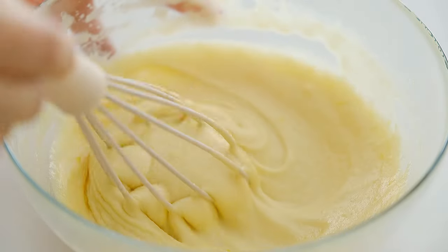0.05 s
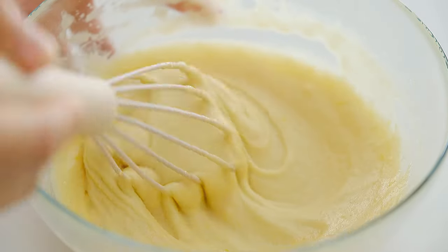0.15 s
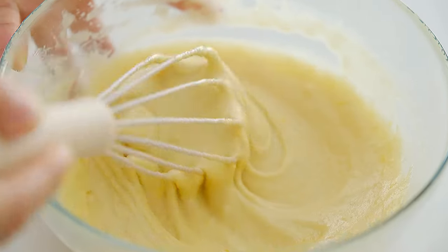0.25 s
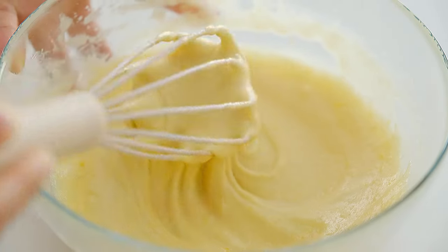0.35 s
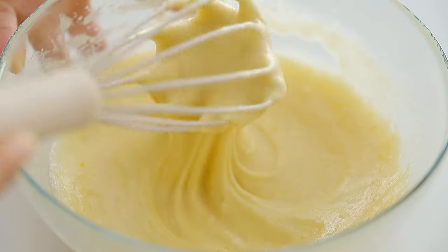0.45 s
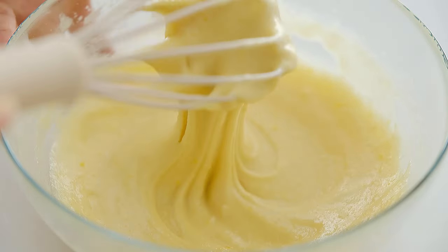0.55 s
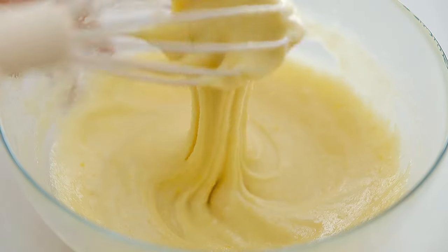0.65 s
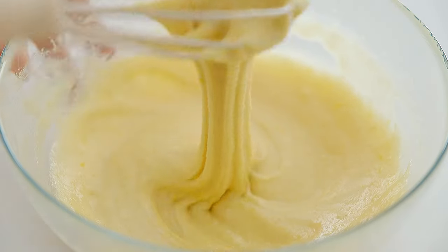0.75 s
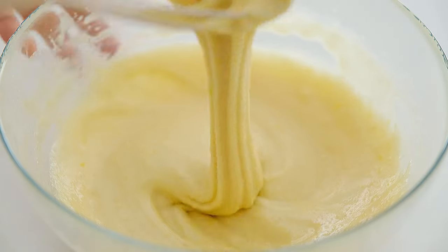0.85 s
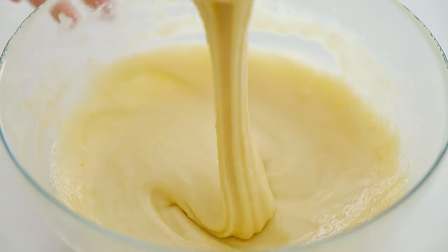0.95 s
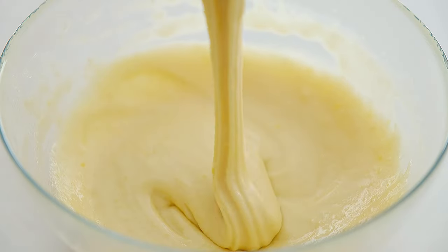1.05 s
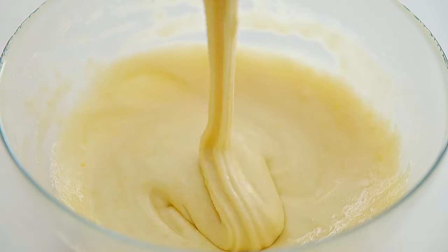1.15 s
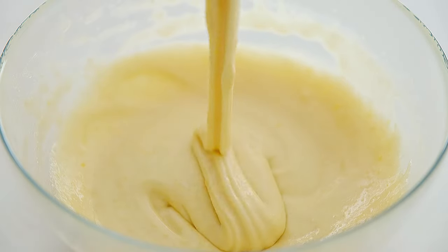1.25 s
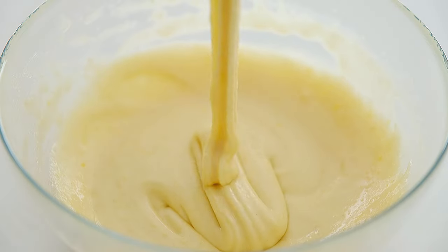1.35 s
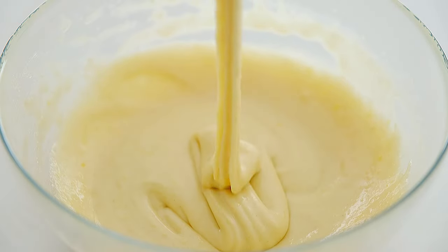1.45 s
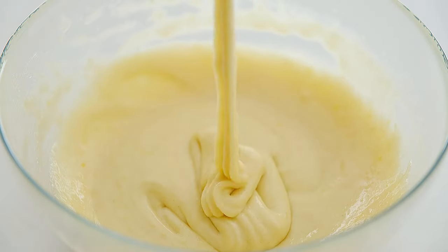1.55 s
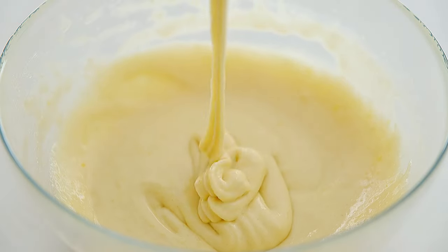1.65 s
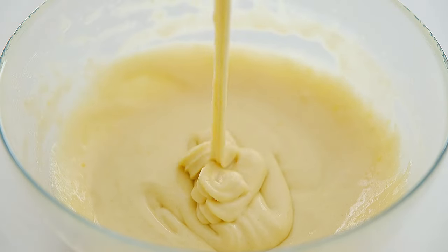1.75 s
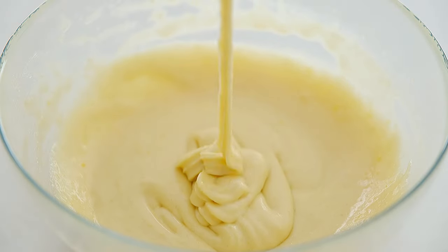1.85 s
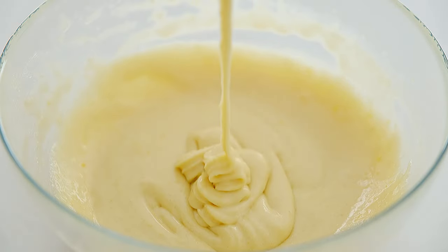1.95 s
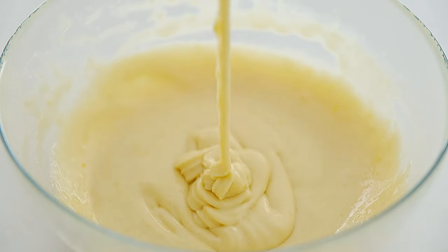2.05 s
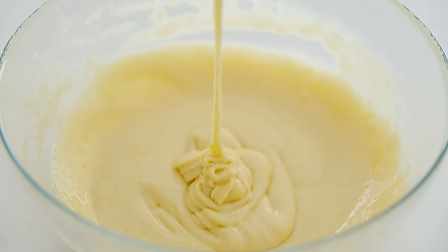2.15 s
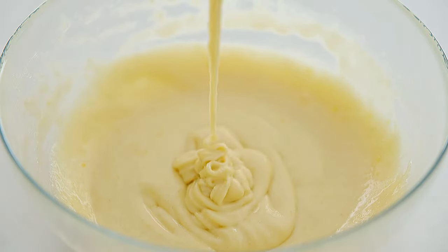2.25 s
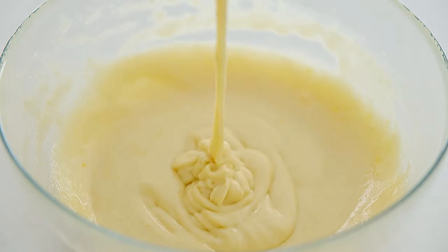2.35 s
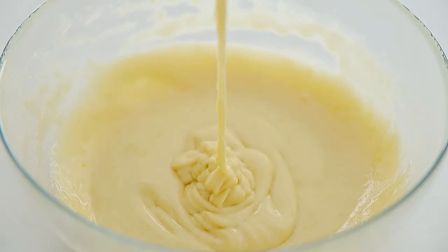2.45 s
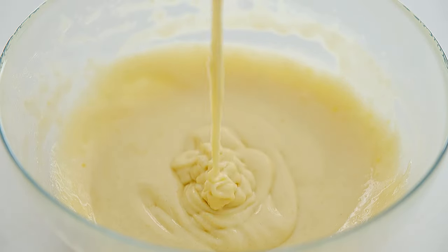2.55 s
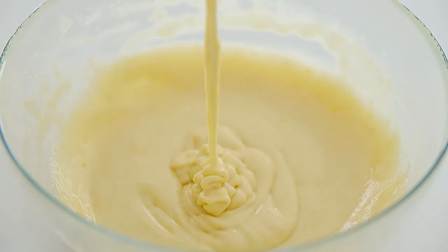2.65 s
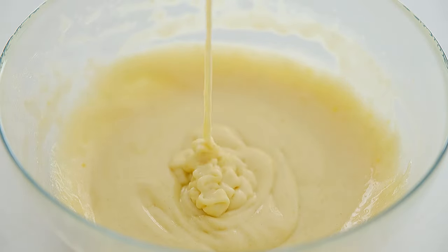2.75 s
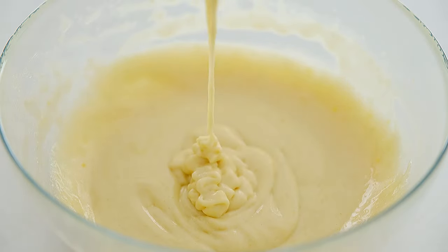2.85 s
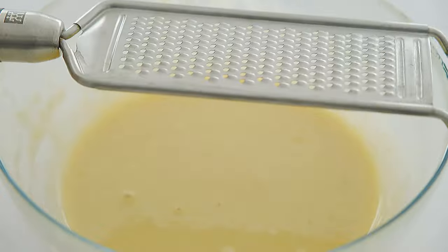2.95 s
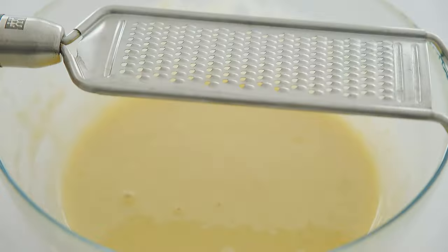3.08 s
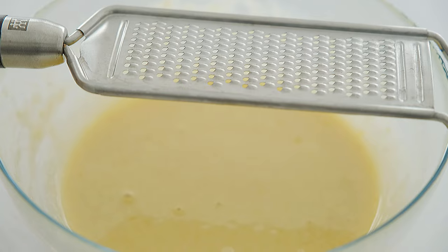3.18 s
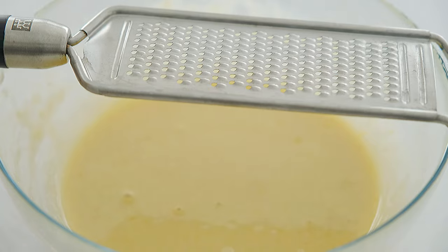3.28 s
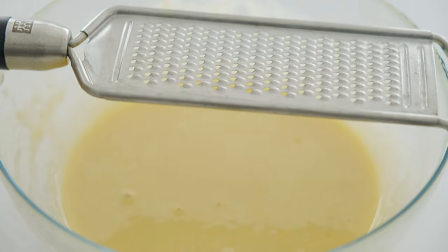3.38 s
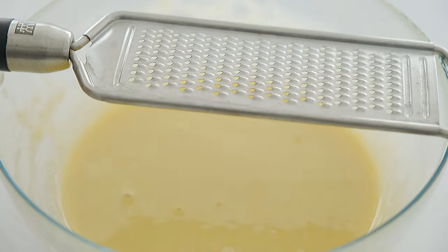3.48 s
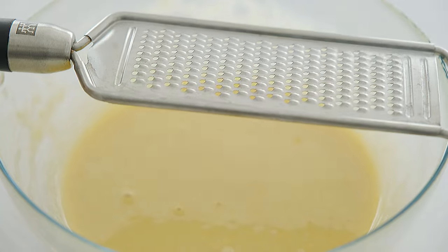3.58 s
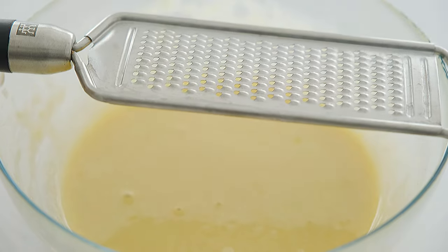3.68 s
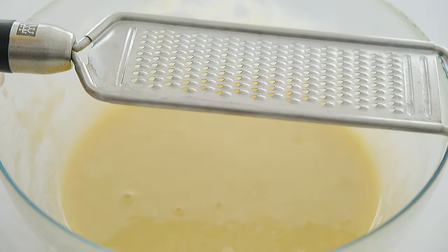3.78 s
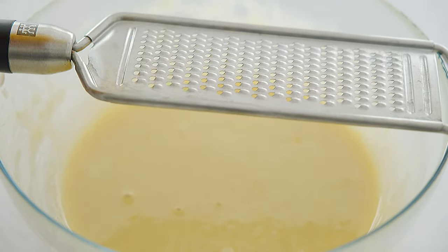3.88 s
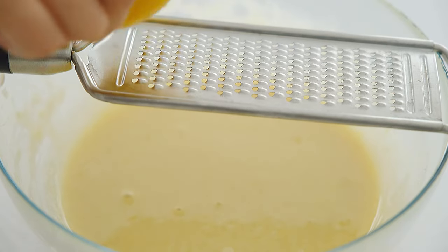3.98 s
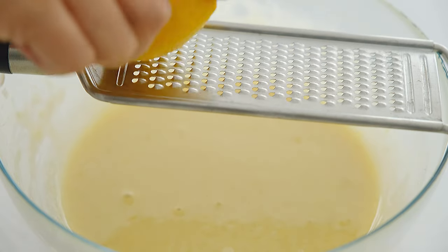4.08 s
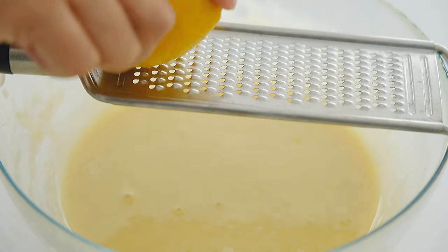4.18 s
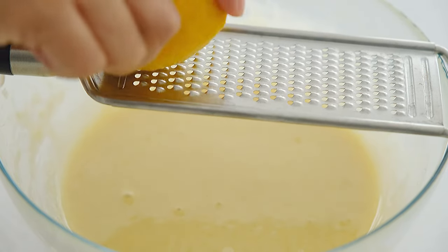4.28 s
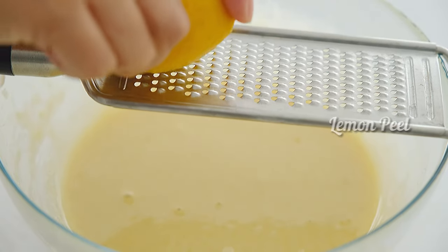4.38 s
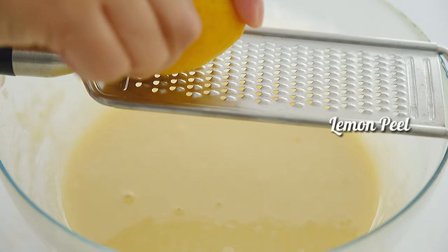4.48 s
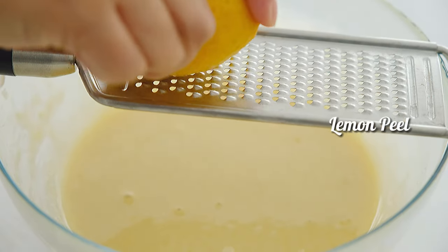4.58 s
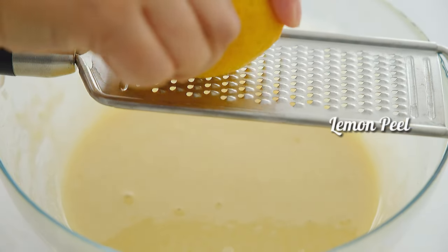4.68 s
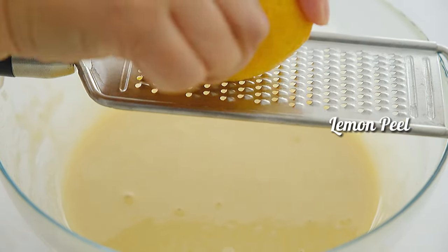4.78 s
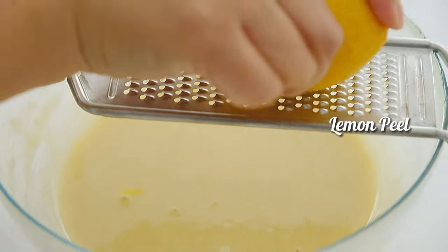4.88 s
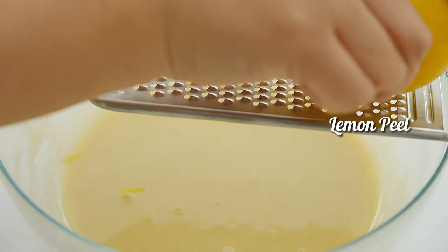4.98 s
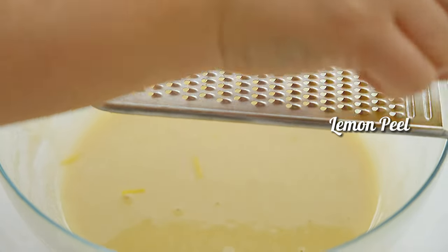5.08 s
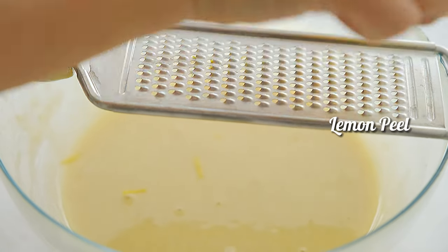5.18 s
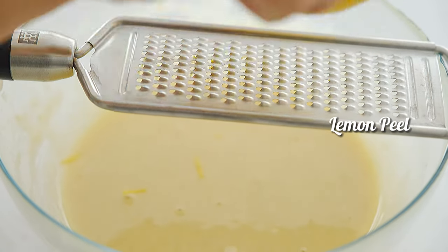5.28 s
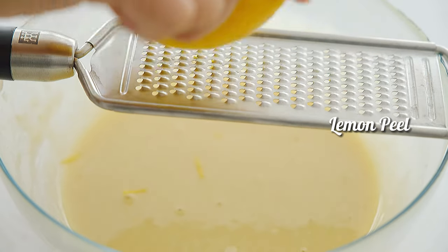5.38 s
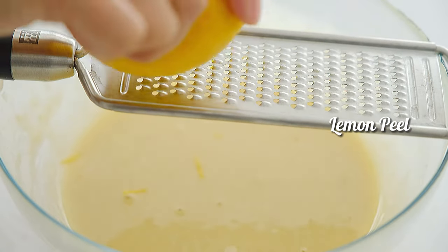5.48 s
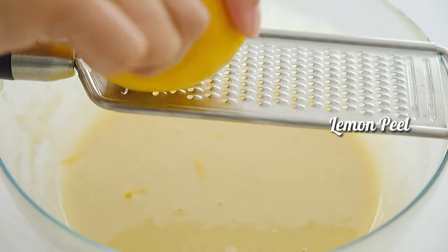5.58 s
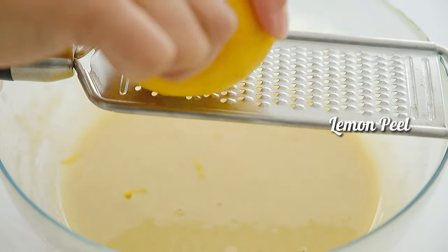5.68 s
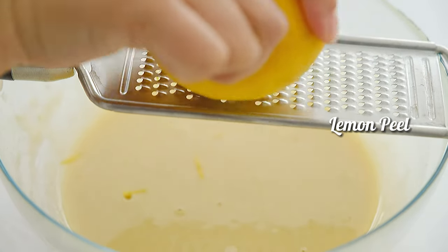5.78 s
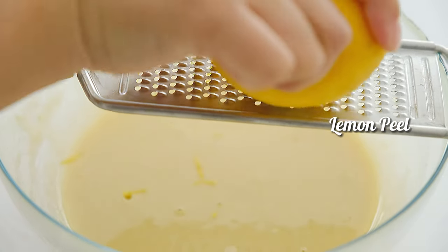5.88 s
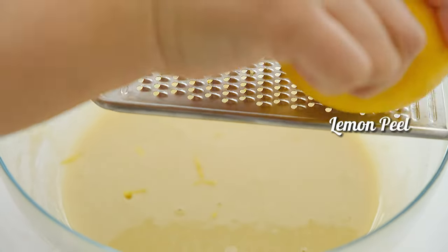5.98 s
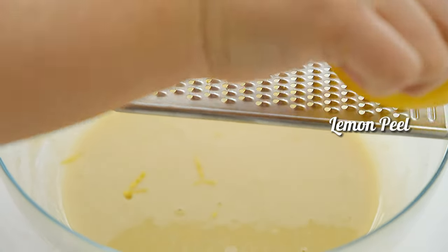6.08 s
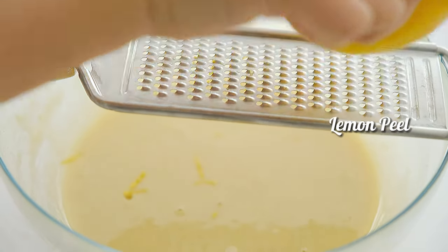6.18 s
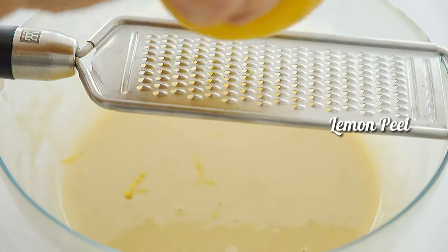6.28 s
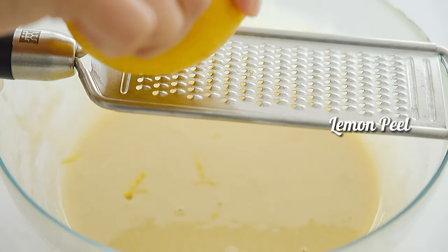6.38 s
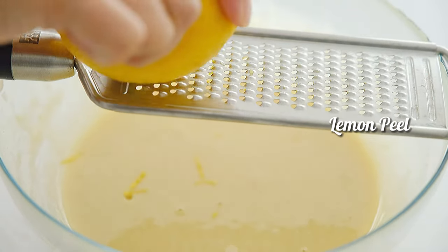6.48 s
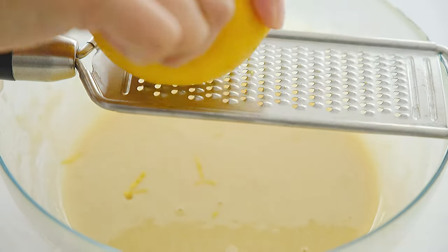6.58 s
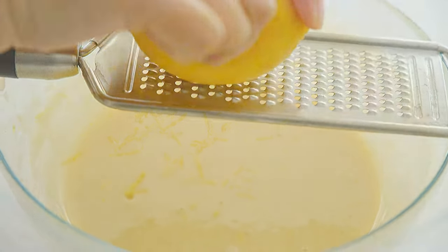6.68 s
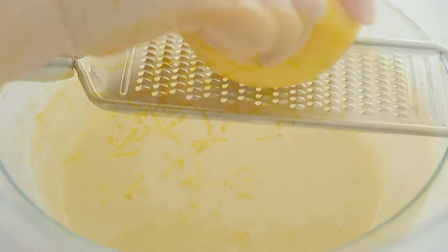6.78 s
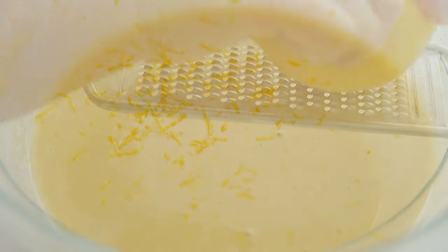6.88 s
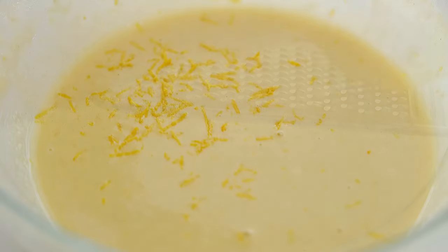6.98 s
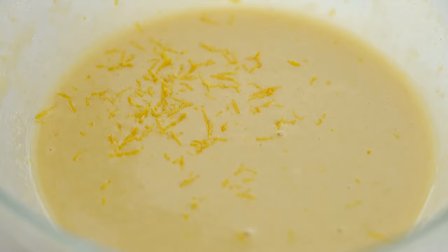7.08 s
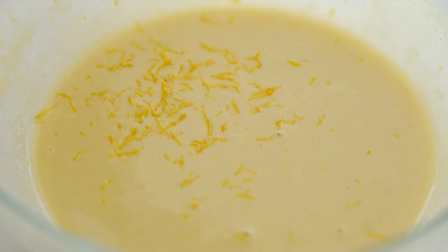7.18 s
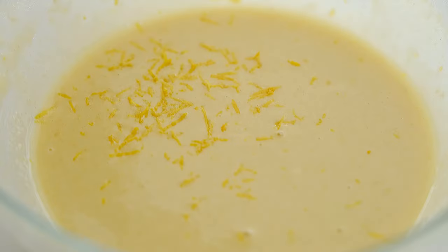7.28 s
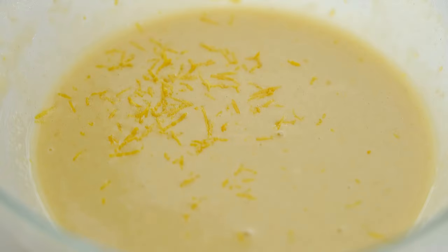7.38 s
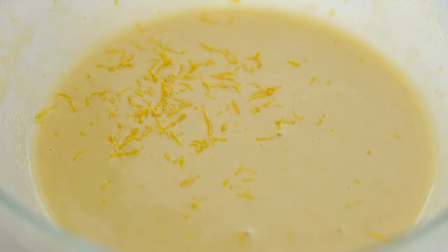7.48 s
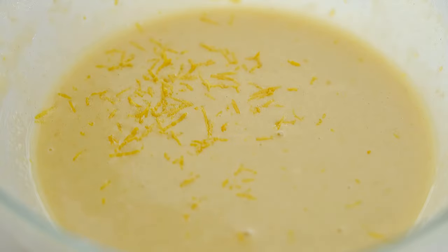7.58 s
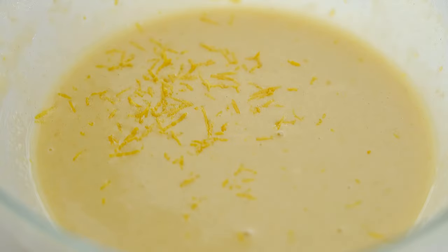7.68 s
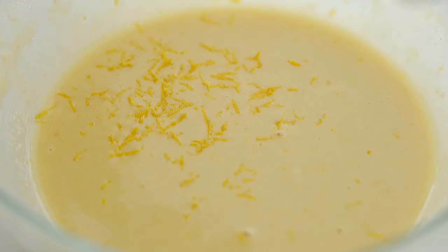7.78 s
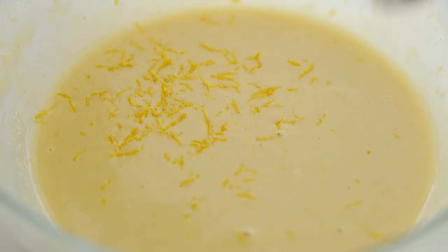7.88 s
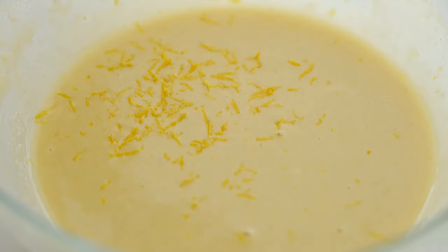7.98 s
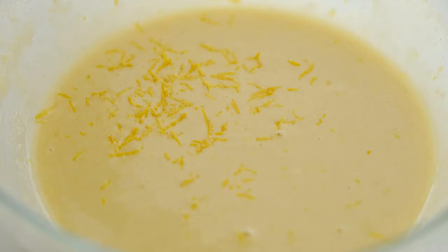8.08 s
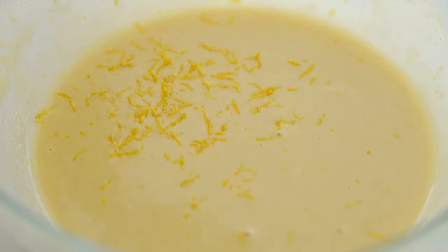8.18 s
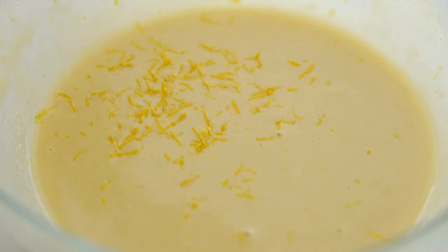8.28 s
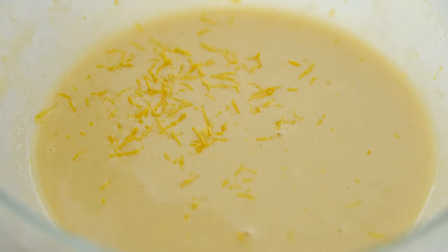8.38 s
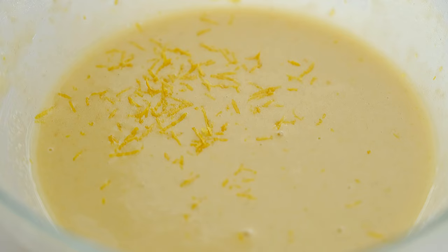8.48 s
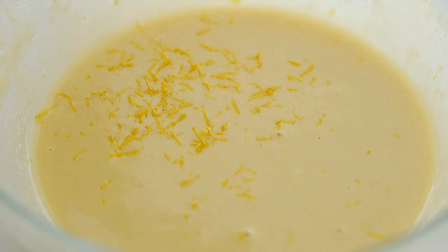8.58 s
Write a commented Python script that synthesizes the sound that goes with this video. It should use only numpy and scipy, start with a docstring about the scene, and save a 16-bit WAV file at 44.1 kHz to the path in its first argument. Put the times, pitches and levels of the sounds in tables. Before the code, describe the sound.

Very quiet batter ticks and a barely audible whisk rustle lead to two small bright steel-on-glass clinks. Soft fruit knocks precede three coarse scraping strokes, whose teeth catch and tear in uneven bursts. Then come four brief, crisp flicks across the blade, spaced out by soft taps. Recorded close and detailed in a small, lightly reverberant kitchen over faint hiss.

```python
"""A lemon is pushed over a flat steel grater: three long strokes that snag, then four quick, brighter ones.
Random cuts, thousands a second, excite the blade, whose resonances swell and fade; caught teeth tear loose.
The fruit lands with soft knocks, steel clinks and slides on a glass rim, and the freed blade briefly sings.
Batter ticks and rustles off a whisk; a small kitchen answers in a noise tail, over hiss with a faint hum."""
import sys
import numpy as np
from scipy import signal
from scipy.fft import rfft, irfft, next_fast_len
from scipy.io import wavfile
from scipy.ndimage import uniform_filter1d

SR = 44100
rng = np.random.default_rng(int(sys.argv[2]) if len(sys.argv) > 2 else 0)


def wav_out(sig):
    """Save sig, one row per channel (or a flat mono array), as 16-bit PCM at SR to the path in sys.argv[1]."""
    wavfile.write(sys.argv[1], SR, np.round(np.clip(np.atleast_2d(sig).T, -1, 1) * 32767).astype(np.int16))


N = 381465


def amp(db):
    """Decibel law: level in dB to amplitude ratio."""
    return 10 ** (np.asarray(db) / 20)


def unit(x):
    """Normalisation to an effective (RMS) value of 1."""
    return x / np.sqrt(np.mean(x ** 2) + 1e-20)


def along(points, hz):
    """Interpolation of (frequency_hz, value) points on a logarithmic frequency axis."""
    f, v = np.transpose(points)
    return np.interp(np.log(hz + 1), np.log(f + 1), v)


def wobble(rate):
    """Slow random modulation: straight lines between random knots, `rate` of them a second."""
    knots = rng.standard_normal(int(N * rate / SR) + 2)
    return np.interp(np.arange(N) * rate / SR, np.arange(len(knots)), knots)


def add(track, s, sound):
    """Superposition: mix a sound into the track at time s."""
    part = track[round(s * SR):][:len(sound)]
    part += sound[:len(part)]


def through(x, response):
    """Linear filtering: x convolved with an impulse response."""
    return signal.oaconvolve(x, response)[:len(x)]


def colour(points, size=2048):
    """Minimum phase: the causal impulse response of energy 1 with the given spectrum."""
    cepstrum = irfft(np.log(amp(along(points, np.fft.rfftfreq(size, 1 / SR)))))
    cepstrum[1:size // 2] *= 2
    cepstrum[size // 2 + 1:] = 0
    response = irfft(np.exp(rfft(cepstrum)))
    return response / np.linalg.norm(response)


def resonate(x, hz, width):
    """Resonance: one mode with gain 1 at its centre and a bandwidth in Hz."""
    return signal.lfilter(*signal.iirpeak(hz, hz / width, fs=SR), x)


def band(x, hz, kind):
    """Band limiting: a fourth-order low-pass or high-pass."""
    return signal.sosfilt(signal.butter(4, hz, kind, fs=SR, output='sos'), x)


def split(x, hz):
    """Complementary filtering: the parts of x below and above hz, which add up to x."""
    low = signal.sosfiltfilt(signal.butter(6, hz, fs=SR, output='sos'), x)
    return low, x - low


def burst(t60, size=6000):
    """Impact excitation: random signs under an exponential decay, cut off after `size` samples."""
    return rng.choice([-1, 1], size) * amp(-60 * np.arange(size) / SR / max(t60, .002))


def press(s, length, rise_db_per_s, fall_db_per_s, sag_db_per_s=0):
    """Contact envelope: the gain swells until s, holds with a slight sag, and dies away."""
    t = np.arange(N) / SR - s
    rise_db = rise_db_per_s * np.minimum(t, 0)
    sag_db = sag_db_per_s * np.clip(t, 0, length)
    fall_db = fall_db_per_s * np.maximum(t - length, 0)
    return amp(np.maximum(rise_db - sag_db - fall_db, -120))


def since(s, length):
    """Travel time: seconds since s, held between 0 and length."""
    return np.clip(np.arange(N) / SR - s, 0, length)


# long strokes, the fruit dragging along the blade: start_s [s], length_s [s], level_db [dB]
DRAGS = [(4.526, 0.49, -45.5), (5.595, 0.37, -38), (6.488, 0.43, -44)]
DRAG_RISE_DB_PER_S, DRAG_FALL_DB_PER_S = 427.5, 207
DRAG_TREBLE_DB, DRAG_DULLING_DB_PER_S = -10.5, 18.5  # the drag dulls as the fruit travels
# teeth biting into the peel: start_s [s], length_s [s], level_db [dB], treble_db [dB re rasp]
BITES = [(4.382, 0.041, -65.5, -3), (4.442, 0.064, -51.5, -7), (4.543, .024, -32, -10),
         (4.609, 0.035, -29, -9), (4.707, .048, -30.5, -7.5), (4.781, .028, -32.5, -7),
         (4.958, .03, -40.5, -12.5), (5.633, 0.18, -35, -8.5), (5.736, .225, -32.5, -10),
         (5.993, 0.013, -36.5, -13), (6.488, 0.047, -33.5, -13), (6.576, 0.029, -27.5, -9),
         (6.673, 0.031, -33.5, -8.5), (6.741, 0.16, -31, -13)]
BITE_RISE_DB_PER_S, BITE_FALL_DB_PER_S, BITE_SAG_DB_PER_S = 1249, 702.5, 18.5


def long_strokes():
    """Sliding friction: dull drags and louder bites, as (gain, treble dB) for each contact."""
    contacts = []
    for s, length, db in DRAGS:
        gain = amp(db) * press(s, length, DRAG_RISE_DB_PER_S, DRAG_FALL_DB_PER_S)
        contacts.append((gain, DRAG_TREBLE_DB - DRAG_DULLING_DB_PER_S * since(s, length)))
    for s, length, db, treble_db in BITES:
        gain = amp(db) * press(s, length, BITE_RISE_DB_PER_S, BITE_FALL_DB_PER_S, BITE_SAG_DB_PER_S)
        contacts.append((gain, treble_db))
    return contacts


# quick, light strokes: start_s [s], length_s [s], level_db [dB], treble_db [dB re rasp]
FLICKS = [(7.306, 0.0028, -40, -4.5), (7.419, 0.057, -27, -7), (7.756, 0.067, -26.5, -3),
          (8.105, 0.053, -26, -5), (8.592, 0.0032, -24.5, -4), (8.63, .03, -26.5, -4)]
FLICK_RISE_DB_PER_S, FLICK_FALL_DB_PER_S, FLICK_SAG_DB_PER_S = 899, 309, 33.5
FLICK_STOP_S = .008  # a flick shorter than this stops twice as fast
FLICK_DULLING_DB_PER_S = 47
REST_S, REST_DB = 0.061, -35  # the fruit brushes the teeth this long before a flick, this far under it


def quick_strokes():
    """Light friction: a brush, a flick and an easing off, as (gain, treble dB) for each contact."""
    contacts = []
    for s, length, db, treble_db in FLICKS:
        brush = amp(REST_DB) * press(s - REST_S, REST_S, FLICK_RISE_DB_PER_S, FLICK_FALL_DB_PER_S)
        fall = FLICK_FALL_DB_PER_S * (2 if length < FLICK_STOP_S else 1)
        flick = press(s, length, FLICK_RISE_DB_PER_S, fall, FLICK_SAG_DB_PER_S)
        bright_db = treble_db - FLICK_DULLING_DB_PER_S * since(s, 2 * length)
        contacts.append((amp(db) * np.maximum(brush, flick), bright_db))
    return contacts


def shifting(x, depth_db):
    """Modal density: countless close plate modes swell and fade, as a smoothed random gain field."""
    z = signal.stft(x, nperseg=1024)[2]
    field = uniform_filter1d(rng.standard_normal(z.shape), size=3, axis=0)
    field = uniform_filter1d(field, size=5, axis=1)
    return signal.istft(z * amp(depth_db * unit(field)), nperseg=1024)[1][:N]


# blade modes under the fruit: pitch_hz [Hz], width_hz [Hz], level_db [dB re plain rasp, before a common gain]
BLADE_MODES = [(241, 22, 3.5), (377, 46, -2), (757, 140, 4.5), (1308, 110, -10), (2040, 24, -18.5),
               (2434, 64, -16.5), (3388, 65, -3.5), (4130, 46, 4), (4820, 200, 2.5), (5910, 36, 1.5),
               (6600, 32, -2), (7880, 160, 3), (8750, 120, 8.5), (9700, 50, 1), (11330, 79, -1.5),
               (12400, 130, -5.5), (13600, 55, 0.5)]
# spectrum of peel cut by long strokes: frequency_hz [Hz], density_db [dB per Hz]
PEEL_SPECTRUM = [(88, -79), (150, -44), (359, -24.5), (404, -25), (736, -14.5), (1020, -8.5), (1370, 5),
                 (1660, 0), (2500, 3.5), (3760, -0.5), (4060, 0), (5650, -12.5), (8010, -18),
                 (10500, -20.5), (15500, -20.5)]
# spectrum of peel cut by quick strokes, also of the swish: frequency_hz [Hz], density_db [dB per Hz]
QUICK_PEEL_SPECTRUM = [(130, -89.5), (230, -75.5), (380, -18), (520, -20.5), (790, -9.5), (1100, -8),
                       (1480, -0.5), (2600, 1), (4400, -2.5), (6000, -10.5), (12500, -12.5), (15500, -16.5)]


def rasp(contacts, peel, cuts_per_s, spread_db, clump_db, ring_db, thrum_db, body_db, treble_db):
    """Random excitation of a plate: clumped tiny cuts drive blade modes whose levels drift independently."""
    struck = rng.random(N) < cuts_per_s / SR
    cuts = struck * rng.choice([-1, 1], N) * amp(spread_db * rng.standard_normal(N))
    clumping = amp(clump_db * wobble(260) + 1.5 * wobble(55))
    force = (unit(cuts) + .35 * rng.standard_normal(N)) * clumping
    plain = shifting(through(force, colour(peel)), depth_db=3)
    ring = np.zeros(N)
    for hz, width, db in BLADE_MODES:
        ring += amp(db + 4.5 * wobble(18) + 3 * wobble(3)) * resonate(plain, hz, width)
    body, treble = map(unit, split(plain + amp(ring_db) * ring, 6140))
    thrum, body = split(body, 730)
    power = sum(gain ** 2 for gain, bright_db in contacts)
    bright = sum(gain ** 2 * bright_db for gain, bright_db in contacts) / power
    # clean cutting hisses; dull dragging shakes the whole grater instead
    low = amp(thrum_db - 0.5 * (bright + 6.5)) * thrum
    return np.sqrt(power) * (low + amp(body_db) * body + amp(treble_db + bright) * treble)


# the loudest catches of a tooth in the peel: start_s [s], level_db [dB, before a 13 dB cut]
SNAGS = [(4.547, -14), (4.627, -13.5), (4.703, -7.5), (4.781, -7), (4.798, -6), (4.81, -11), (5.636, -15),
         (5.696, -16), (5.748, -9), (5.824, -10.5), (5.912, -16), (5.962, -16.5), (6.469, -20.5),
         (6.486, -21), (6.572, -16), (6.59, -5.5), (6.605, -11.5), (7.417, -10)]
SNAG_T60_S, SMALL_SNAGS_PER_S = 0.039, 14
SMALL_SNAG_DB = 5  # lesser catches at random times, re the stroke gain, before a 9 dB cut


def snags():
    """Stick and release: caught teeth let go in short tears; stroke pressure scales the lesser ones."""
    tears = np.zeros(N)
    for s, db in SNAGS:
        add(tears, s, amp(db - 13) * burst(SNAG_T60_S))
    pressure = sum(gain for gain, treble_db in long_strokes())
    for at in rng.integers(N, size=round(SMALL_SNAGS_PER_S * N / SR)):
        add(tears, at / SR, pressure[at] * amp(SMALL_SNAG_DB - 9) * burst(SNAG_T60_S))
    plain = through(tears, colour(PEEL_SPECTRUM))
    ring = sum(amp(db) * resonate(plain, hz, width) for hz, width, db in BLADE_MODES)
    return plain + amp(-8.5) * ring


# soft knocks on the grater, mostly the lemon landing on the blade: start_s [s], level_db [dB peak, less 0.5],
# thud_db [dB, before +24], treble_db [dB, before +22], pitch_hz of the spot [Hz], t60_s [s]
TAPS = [(3.102, -40.5, -12, -51, 1010, 0.084), (4.077, -22, -18, -24, 2590, 0.038),
        (4.088, -23, -23.5, -36, 1350, 0.034), (4.196, -24, -20.5, -34, 1400, 0.025),
        (5.509, -24.5, -16, -21, 2770, 0.024), (6.391, -36, -13, -24.5, 2700, 0.046),
        (7.225, -11.5, -21.5, -9, 4040, 0.02), (7.694, -21.5, -23.5, -22.5, 1670, 0.025),
        (8.048, -25, -29, -17, 1650, 0.026), (8.476, -18.5, -25, -13.5, 3920, 0.027)]
# modes of the grater knocked as a whole: pitch_hz [Hz], width_hz [Hz], level_db [dB]
KNOCK_MODES = [(261, 23, -10.5), (393, 8.4, -8), (742, 21, -2), (1307, 7.2, 1.5), (1540, 110, 5.5),
               (2410, 16, 3), (2810, 190, -2), (2960, 15, 4.5), (3994, 25, 2), (4090, 110, -4)]
# spectrum of the soft contact: frequency_hz [Hz], density_db [dB per Hz]
CONTACT_SPECTRUM = [(120, -72), (250, -26.5), (600, -9.5), (1400, -4), (2700, 1.5), (4700, -3.5),
                    (6000, -18), (15000, -18.5)]


def taps():
    """Impact hardness: each landing is a crack and a knock of the grater; softer ones lose highs first."""
    out = np.zeros(N)
    lead = 256  # silent samples before the blow, room for the two-way filters
    for s, db, thud_db, treble_db, spot_hz, t60 in TAPS:
        blow = np.pad(burst(t60), (lead, 0))
        knock = np.zeros(len(blow))
        for hz, width, level in KNOCK_MODES:
            knock += amp(level + rng.normal(0, 1.16)) * resonate(blow, hz, width)
        struck = through(blow, colour(CONTACT_SPECTRUM)) + amp(5.5) * band(knock, 210, 'high')
        low, rest = split(struck, 1000)
        mid, rest = split(rest, 2500)
        upper, high = split(rest, 7200)
        hard_db = treble_db + 22
        crack = amp(thud_db + 24) * low + mid
        crack += amp(0.44 * min(hard_db, 0)) * upper + amp(hard_db) * high
        # each spot on the blade favours one broad resonance
        spot = resonate(resonate(blow, spot_hz, .3 * spot_hz), spot_hz, .3 * spot_hz)
        tap = unit(crack) + amp(-6.5) * unit(spot)
        add(out, s - lead / SR, amp(db - 0.5) * tap / np.abs(tap).max())
    return out


# whisk, then grater, meets the glass rim: start_s [s], level_db [dB], chatter_length_s [s],
# chatter_t60_s [s], ring_db [dB re chatter, before a 15 dB cut]
CLINKS = [(0.565, -58, 0.002, 0.078, -6.5), (2.951, -23.5, 0.0073, 0.019, -19),
          (3.438, -27, 0.004, 0.037, -15.5)]
# spectrum of the steel chatter: frequency_hz [Hz], density_db [dB per Hz]
STEEL_SPECTRUM = [(150, -55.5), (450, -28.5), (1000, -11), (1900, -5.5), (3600, -8), (4950, 3), (5600, -17),
                  (6450, -4.5), (7200, -16.5), (8500, -14), (15000, -24)]
# modes of grater and bowl ringing together: pitch_hz [Hz], level_db [dB], t60_s [s]
RIM_MODES = [(1385, -4.5, 0.6), (1712, -7, .25), (2060, -1.5, 0.44), (2270, -4, 1), (2460, -8, 0.55),
             (2990, 1.5, 0.39), (3500, -1, 0.83), (4400, -10.5, 0.455), (4845, -3.5, .5), (4900, -7.5, .6),
             (5943, -24.5, .45), (6380, -10, 0.36), (7970, -23.5, .4), (9970, -28.5, .28)]


def clinks():
    """Modal beating: steel chatters for milliseconds on the rim, then both ring in close pairs of modes."""
    out, t = np.zeros(N), np.arange(SR) / SR
    for s, db, length, chatter_t60, ring_db in CLINKS:
        held = amp(-60 * np.maximum(t - length, 0) / chatter_t60)
        chatter = through(held * rng.choice([-1, 1], SR), colour(STEEL_SPECTRUM))
        ring = np.zeros(SR)
        for hz, level, t60 in RIM_MODES:
            near_hz = hz + rng.normal(0, 11)
            pair = np.sin(2 * np.pi * hz * t) + .55 * np.sin(2 * np.pi * near_hz * t)
            ring += amp(level + rng.normal(0, 1.476) - 60 * t / t60) * pair
        add(out, s, amp(db) * (chatter + amp(ring_db - 15) * ring))
    return out


# the grater shifts along the rim: start_s [s], length_s [s], level_db [dB]
SHIFTS = [(3.06, 0.1, -59.5), (3.366, 0.015, -62), (3.701, 0.0097, -54.5)]
SHIFT_RISE_DB_PER_S, SHIFT_FALL_DB_PER_S = 1300, 73.5
# spectrum of steel rubbing on glass: frequency_hz [Hz], density_db [dB per Hz]
RUBBING_SPECTRUM = [(300, -25.5), (600, -9), (1000, -11), (1300, 0.5), (2300, -3.5), (3000, -11.5),
                    (5000, -9.5), (7000, -36.5), (15000, -39)]


def slide():
    """Friction drive: steel rubs lightly on the glass and excites the modes of the rim."""
    rub = through(rng.standard_normal(N) * amp(1.0 * wobble(97)), colour(RUBBING_SPECTRUM))
    gain = np.zeros(N)
    for s, length, db in SHIFTS:
        gain += amp(db) * press(s, length, SHIFT_RISE_DB_PER_S, SHIFT_FALL_DB_PER_S)
    ring = sum(amp(10.5) * resonate(rub, hz, 22) for hz, level, t60 in RIM_MODES)
    return gain * unit(rub + ring)


# tones of the freed blade: pitch_hz [Hz], level_db [dB]
SINGING_TONES = [(2008, 4), (4097, -2.5), (4646, -5), (7014, -14), (8705, -17.5), (11483, -19),
                 (12974, -23.5)]
# the blade sings as the fruit runs off its end
RUN_OFF_S, RUN_OFF_LENGTH_S, RUN_OFF_DB = 4.992, .006, -40
RUN_OFF_RISE_DB_PER_S, RUN_OFF_FALL_DB_PER_S = 247, 750


def singing():
    """Selective resonance: light friction on the freed blade draws out a few narrow tones."""
    gain = amp(RUN_OFF_DB) * press(RUN_OFF_S, RUN_OFF_LENGTH_S, RUN_OFF_RISE_DB_PER_S, RUN_OFF_FALL_DB_PER_S)
    tones = np.zeros(N)
    for hz, db in SINGING_TONES:
        tones += amp(db) * unit(resonate(rng.standard_normal(N), hz, 23))
    return gain * unit(tones)


# small wet ticks of batter and peel: start_s [s], level_db [dB peak], low_pitch_hz [Hz],
# high_pitch_hz [Hz], t60_s [s]
TICKS = [(.02, -61.5, 785, 905, 0.6), (1.394, -43.5, 940, 1540, 0.011), (1.435, -42, 1720, 4050, 0.024),
         (2.664, -54, 3800, 4300, .03), (3.011, -45, 1920, 3580, 0.057), (5.208, -45.5, 2370, 3340, .02),
         (5.501, -29.5, 10880, 12000, 0.0059), (8.53, -39, 4240, 10100, 0.043)]


def ticks():
    """Damped resonance: small bubbles and flecks pop, each with two broad resonances."""
    out = np.zeros(N)
    for s, db, low_hz, high_hz, t60 in TICKS:
        snap = burst(t60)
        pop = np.zeros(len(snap))
        for hz in (low_hz, high_hz):
            pop += unit(resonate(resonate(snap, hz, 0.28 * hz), hz, 0.28 * hz))
        add(out, s, amp(db) * pop / np.abs(pop).max())
    return out


SWISH_S, SWISH_LENGTH_S, SWISH_DB, SWISH_FADE_DB_PER_S = 0.79, .17, -72, 65


def swish():
    """Modulated noise: batter slides off the wires with a soft, wet rustle."""
    rustle = unit(through(rng.standard_normal(N) * amp(2.5 * wobble(120)), colour(QUICK_PEEL_SPECTRUM)))
    return amp(SWISH_DB) * press(SWISH_S, SWISH_LENGTH_S, SWISH_FADE_DB_PER_S, SWISH_FADE_DB_PER_S) * rustle


# spectrum of the room's answer: frequency_hz [Hz], level_db [dB]
ROOM_COLOUR = [(150, -10), (500, 0), (1400, -2.5), (2300, -2), (4700, -4.5), (6500, -1), (15000, -15.5)]
# decay of the room: frequency_hz [Hz], t60_s [s, before stretching]
ROOM_DECAY = [(300, .45), (800, 0.4), (2100, 0.51), (5500, 0.36), (14000, 0.15)]


def kitchen(x, stretch):
    """Reverberation: a diffuse noise tail in which each frequency dies at its own speed."""
    hz, t, z = signal.stft(rng.standard_normal(SR), SR, nperseg=256)
    t60 = stretch * along(ROOM_DECAY, hz)[:, None]
    decay = amp(along(ROOM_COLOUR, hz)[:, None] - 60 * t / t60)
    build_up = 1 - np.exp(-t / 0.0028)
    tail = signal.istft(z * decay * build_up, SR, nperseg=256)[1]
    return through(x, tail / np.linalg.norm(tail))


# spectrum of the background air: frequency_hz [Hz], density_db [dB per Hz]
HISS_SPECTRUM = [(100, -54.5), (215, -35.5), (340, -13), (500, -4), (1300, -2), (2500, -4.5), (6000, -7),
                 (15500, -9.5)]
# faint tones in the background: pitch_hz [Hz], level_db [dB re hiss]
HUM_TONES = [(543.7, -19.5), (1238, -23), (3316, -20.5)]
# the background steps to a new level: start_s [s], level_db [dB]
HISS_STEPS = [(0, -67), (2.837, -86), (3.696, -65.5), (4.27, -74.5)]
HISS_STEP_S = .008  # duration of each step


def hiss():
    """Stationary noise: background air with a faint hum, wavering slightly and stepping in level."""
    t = np.arange(N) / SR
    hum = np.zeros(N)
    for hz, db in HUM_TONES:
        hum += amp(db) * np.sqrt(2) * np.sin(2 * np.pi * hz * t + wobble(7.7))
    air = unit(through(rng.standard_normal(N), colour(HISS_SPECTRUM)))
    starts, levels_db = np.transpose(HISS_STEPS)
    stepped_db = levels_db[np.searchsorted(starts[1:], t)]
    level_db = uniform_filter1d(stepped_db, round(HISS_STEP_S * SR))
    return amp(level_db + 0.63 * wobble(6.5)) * (air + hum)


def scene():
    """Superposition: strokes, knocks and clinks in the kitchen, over the background hiss."""
    slow = rasp(long_strokes(), PEEL_SPECTRUM, cuts_per_s=2200, spread_db=2.0, clump_db=2.0,
                ring_db=0, thrum_db=4.0, body_db=-1.5, treble_db=1) + snags()
    quick = rasp(quick_strokes(), QUICK_PEEL_SPECTRUM, cuts_per_s=3500, spread_db=3.5, clump_db=2.3,
                 ring_db=-11.5, thrum_db=-6, body_db=-1.5, treble_db=-1.0)
    knocks = taps() + ticks()
    grater = clinks()
    room = kitchen(amp(-18.0) * slow + amp(-17.0) * knocks + amp(-21.5) * grater, stretch=0.63)
    room += kitchen(amp(-18) * quick, stretch=1.15)
    return (slow + quick + knocks + grater + slide() + singing() + swish() + room + hiss())[None]


TOP_HZ, FADE_S = 15650, .006


def record(dry):
    """Band limiting: a low cut at 250 Hz, a short fade at the end and a steep cut around TOP_HZ."""
    size = next_fast_len(N + 8192)
    passed = np.clip((TOP_HZ - np.fft.rfftfreq(size, 1 / SR)) / 400 + .5, 0, 1)
    fade = np.minimum(np.arange(N)[::-1] / SR / FADE_S, 1)
    return irfft(rfft(band(dry, 250, 'high') * fade, size) * passed, size)[:, :N]


dry = scene()
out = record(dry)
wav_out(out)
```